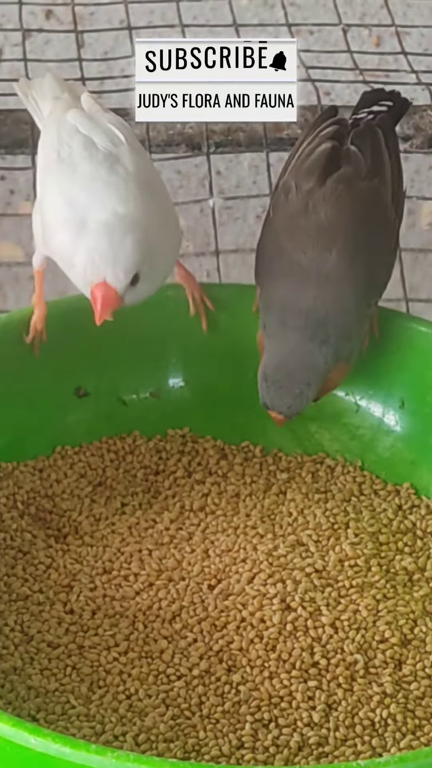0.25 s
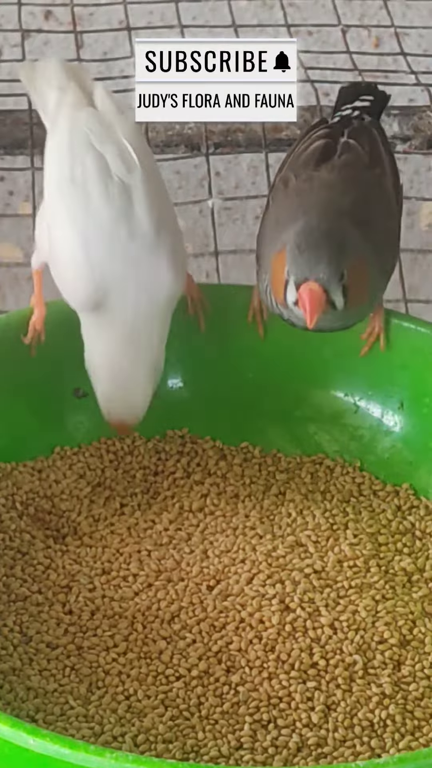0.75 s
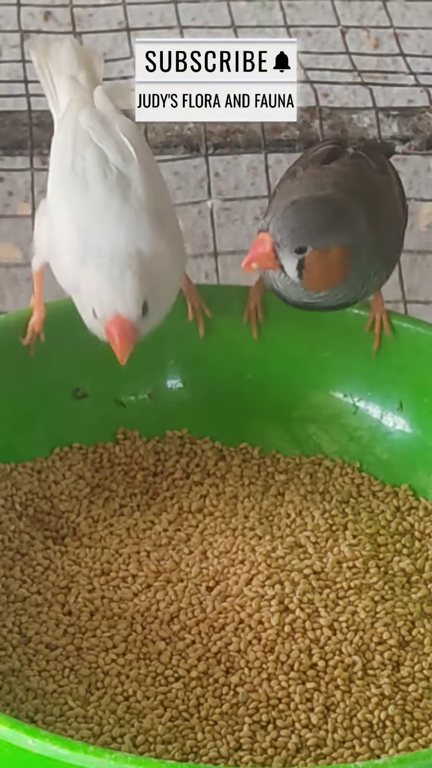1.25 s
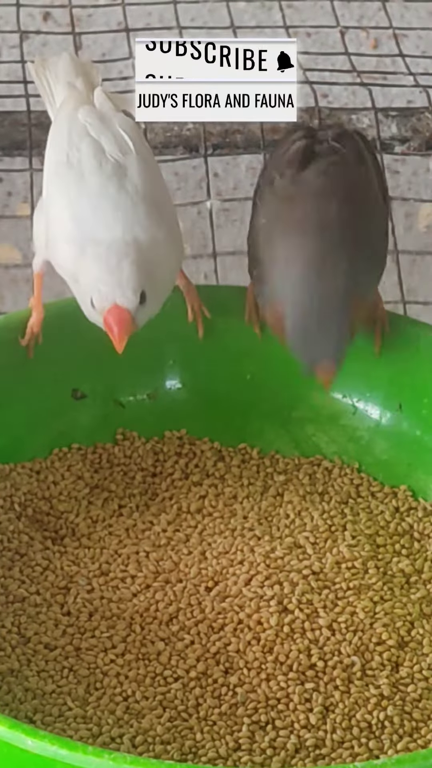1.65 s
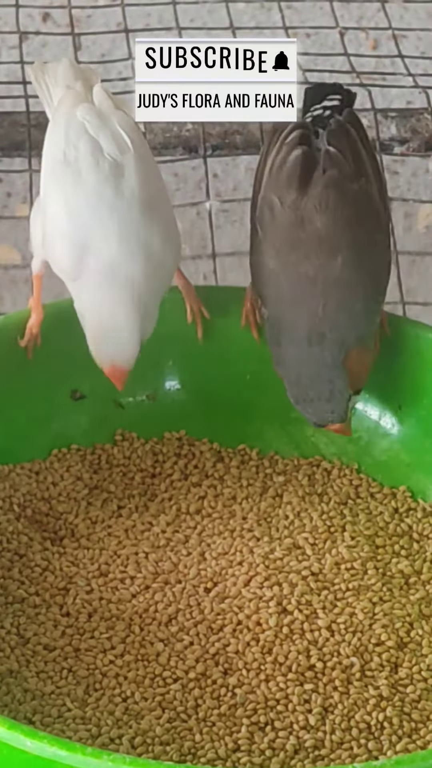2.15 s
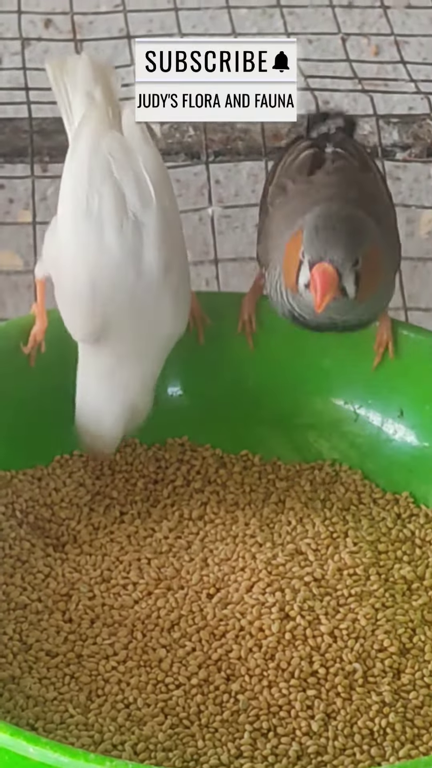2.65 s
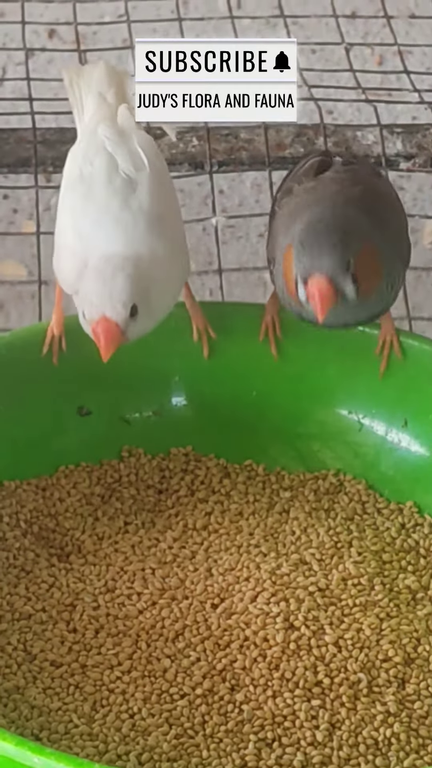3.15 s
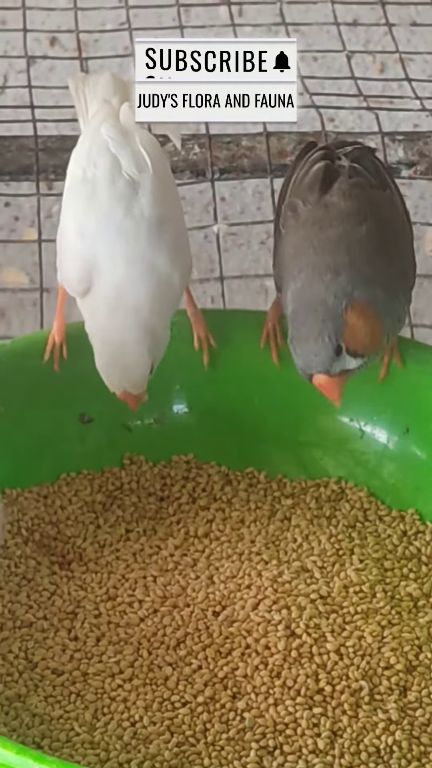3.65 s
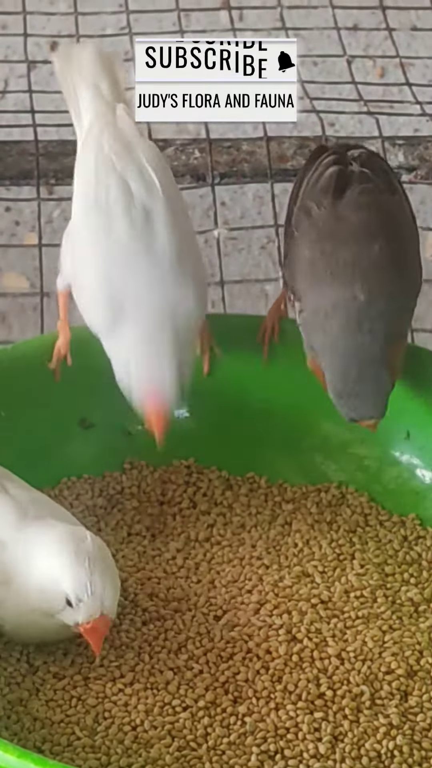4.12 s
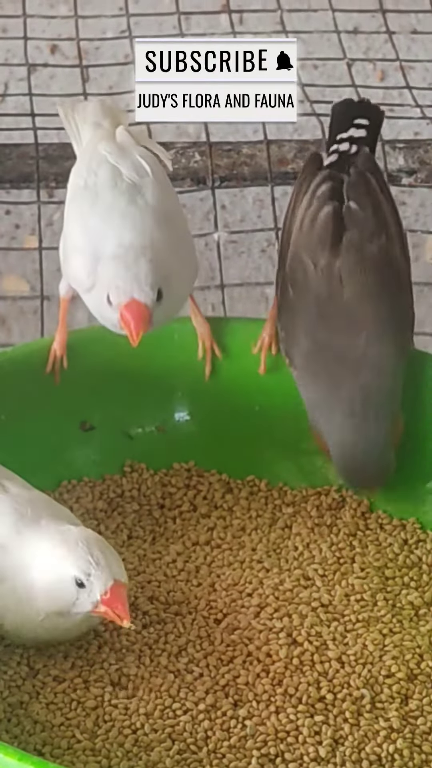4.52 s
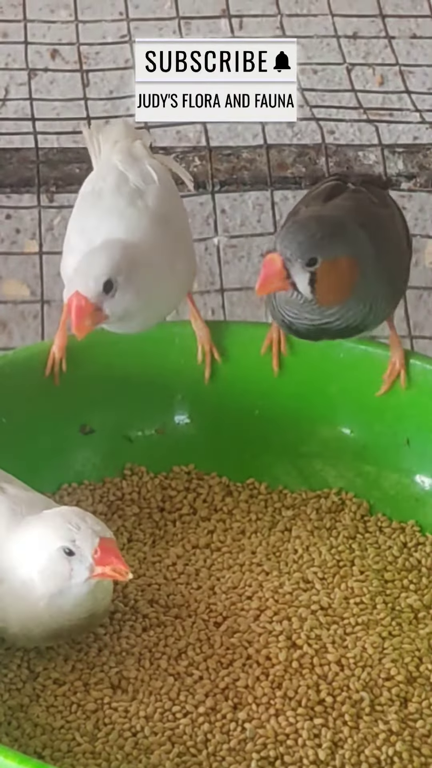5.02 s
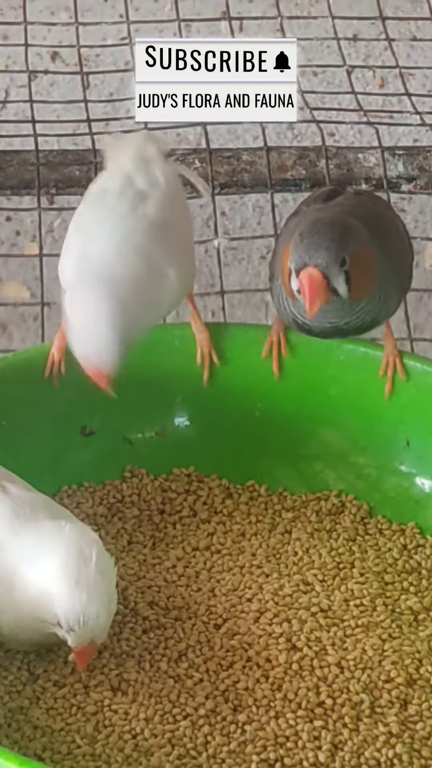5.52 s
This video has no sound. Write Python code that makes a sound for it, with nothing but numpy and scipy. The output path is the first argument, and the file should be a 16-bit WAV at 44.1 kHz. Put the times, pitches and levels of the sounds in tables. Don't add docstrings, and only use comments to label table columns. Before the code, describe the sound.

Finches feeding from a bowl in an echoing room give short nasal calls, raspy song and a repeated bright warble, with tiny husk ticks.

```python
import sys
import numpy as np
from scipy import signal
from scipy.fft import rfft, irfft, next_fast_len
from scipy.io import wavfile

SR = 44100
rng = np.random.default_rng(int(sys.argv[2]) if len(sys.argv) > 2 else 0)


def store_wav(level_fs):
    pcm = np.round(np.clip(np.atleast_2d(level_fs), -1, 1) * 32767)
    wavfile.write(sys.argv[1], SR, pcm.T.astype(np.int16))


def elevation(decibels):
    levels = np.asarray(decibels, float)
    return 10 ** (levels / 20)


N = 254898

# pitch_hz, left_minus_right_db
LEFT_RIGHT_TILT = [(60, 6), (150, 3.5), (380, 6.5), (950, 5.5), (2380, -1.5), (5980, -4.5), (15000, 5.5)]


def at_hz(points, hz):
    table_hz, values = np.array(points).T
    return np.interp(np.log(np.maximum(hz, 1)), np.log(table_hz), values)


def in_time(rows):
    return elevation(np.interp(np.arange(N) / SR, *np.transpose(rows)))


def rms_one(x):
    return x / np.sqrt(np.mean(x ** 2) + 1e-20)


def shaped(x, gain):
    n = x.shape[-1]
    return irfft(rfft(x) * gain(np.fft.rfftfreq(n, 1 / SR)), n)


def bump(hz, centre_hz, octaves):
    return np.exp(-(np.log2(hz / centre_hz + 1e-9) / octaves) ** 2)


def wander(n, rate_hz):
    noise = rng.standard_normal(n + 512)
    return rms_one(shaped(noise, lambda f: 1 / (1 + (f / rate_hz) ** 2))[:n])


def add(track, start_s, x):
    i = round(start_s * SR)
    track[i:i + len(x)] += x[:N - i]


def with_last(rows, value):
    return [(*row, value) for row in rows]


def ring(clicks, hz, t60_s):
    r = elevation(-60 / (t60_s * SR))
    w = 2 * np.pi * hz / SR
    return signal.lfilter([0, np.sin(w)], [1, -2 * r * np.cos(w), r * r], clicks + 1e-18)


def swell(n, rise, fall):
    u = np.arange(n) / n
    ramp = np.clip(np.minimum(u / rise, (1 - u) / fall), 0, 1)
    return np.sin(np.pi / 2 * ramp) ** 2


def voices(calls, arch, jitter, low_hz, clear_hz, closing_octaves=1):
    # pitch_hz, level_db
    nasal = [(400, -63), (700, -11), (1400, -9), (2500, -6), (5000, -7.5), (8000, -11), (12000, -11.5)]
    beak_db, beak_octaves, attack_s = 9, 0.2, 0.011

    def colour(f, top_hz):
        level_db = at_hz(nasal, f) + beak_db * bump(f, top_hz, beak_octaves)
        return elevation(level_db) * f ** 3 / (f ** 3 + low_hz ** 3)

    out = np.zeros(N)
    for start_s, length_s, hz, db, beak_hz, noisy in calls:
        n = round(length_s * SR)
        u = np.arange(n) / n
        pitch = hz * (1 - arch * (2 * u - 1.1) ** 2 + jitter * noisy * wander(n, 146))
        phase = 2 * np.pi * np.cumsum(pitch) / SR
        k = np.arange(1, 14000 // hz + 1)[:, None]
        moving_beak = beak_hz * 2 ** (closing_octaves * (1 - 2 * u))
        strength = colour(k * pitch, moving_beak) / (1 + (k * hz / clear_hz) ** 2)
        stack = np.sum(strength * np.sin(k * phase), axis=0)
        white = rng.standard_normal(n)
        breath = shaped(white, lambda f: colour(f, beak_hz) * f ** 2 / (f ** 2 + hz ** 2))
        noisy = np.clip(noisy, 0, 1)
        voice = np.sqrt(1 - noisy) * rms_one(stack) + np.sqrt(noisy) * rms_one(breath)
        loudness = elevation(db + 4 * noisy * wander(n, 80)) * swell(n, attack_s / length_s, .35)
        add(out, start_s, loudness * voice)
    return out


def whistles(notes, shake, throb_db, third_db):
    # pitch_hz, level_db
    throat = [(3000, -33), (4500, -9), (5700, -40.5), (7500, 1.8), (9000, -2.5), (12000, 6)]
    out = np.zeros(N)
    for start_s, length_s, first_hz, last_hz, db, over_db in notes:
        n = round(length_s * SR)
        plunge = first_hz > 1.2 * last_hz > 4000 and length_s > .032
        glide = 1 - (1 - np.arange(n) / n) ** (7 if plunge else 1)
        pitch = first_hz * (last_hz / first_hz) ** glide * (1 + shake * wander(n, 343))
        phase = 2 * np.pi * np.cumsum(pitch) / SR
        tone = np.sin(phase)
        tone += elevation(over_db + at_hz(throat, 2 * pitch)) * np.sin(2 * phase)
        tone += elevation(over_db + third_db + at_hz(throat, 3 * pitch)) * np.sin(3 * phase)
        loudness = elevation(db + throb_db * wander(n, 120)) * swell(n, .5 if plunge else .18, .08)
        add(out, start_s, loudness * tone)
    return out


def near_calls():
    # start_s, length_s, pitch_hz, level_db, beak_hz
    calls = [
        (.556, 0.058, 681.7, -39.5, 5350),
        (1.085, 0.047, 696.4, -38.5, 5500),
        (1.985, .0785, 666.4, -42, 4570),
        (3.81, 0.049, 682.5, -38.5, 4500),
    ]
    breath_share, dip_hz, dip_db, dip_octaves = .25, 2200, -7.5, 0.36
    sound = voices(with_last(calls, breath_share), arch=0.12, jitter=0.019, low_hz=300, clear_hz=7000)
    return shaped(sound, lambda f: elevation(dip_db * bump(f, dip_hz, dip_octaves)))


def warbler():
    # start_s (after the phrase begins), length_s, first_hz, last_hz, level_db
    phrase = [
        (0, .045, 5146, 3703, -27),
        (0.027, 0.0098, 4275, 4840, -29),
        (0.034, 0.02, 2010, 2470, -38.5),
        (0.048, .027, 4670, 4150, -31),
        (0.069, .038, 2852, 3563, -21.5),
        (0.102, .036, 3450, 2216, -23),
        (0.137, .03, 2250, 3335, -22),
        (0.164, .015, 3178, 4760, -22.5),
    ]
    # start_s, level_db, stretch (times as long), rasp_db
    repeats = [
        (2.294, -2, 1.002, -0.5),
        (3.725, -0.55, 1.032, 2.6),
        (5.174, -1, .99, 1.6),
    ]
    # start_s (after it begins), length_s, pitch_hz, level_db, beak_hz
    phrase_rasps = [
        (0.025, .071, 2027, -32.5, 4440),
        (0.043, .13, 2750, -42, 7300),
        (.148, .03, 2100, -27, 3400),
        (0.165, 0.036, 2153, -32.5, 9700),
    ]
    overtones_db, brighter_db_per_octave, rasp_breath_share = -11.5, 14, 0.97
    notes, rasps = [], []
    for start_s, more_db, stretch, rasp_db in repeats:
        for t, length_s, first_hz, last_hz, db in phrase:
            over_db = overtones_db + brighter_db_per_octave * abs(np.log2(first_hz / 3000))
            notes.append((start_s + stretch * t, stretch * length_s, first_hz, last_hz,
                          db + more_db, over_db))
        for t, length_s, hz, db, beak_hz in phrase_rasps:
            rasps.append((start_s + stretch * t, length_s, hz, db + rasp_db, beak_hz, rasp_breath_share))
    tones = whistles(notes, shake=.012, throb_db=4, third_db=-5)
    return tones + voices(rasps, arch=0.0375, jitter=0.0305, low_hz=2100, clear_hz=11500)


def singer():
    # start_s (after the motif begins), length_s, pitch_hz, level_db, beak_hz
    motif = [
        (0, 0.03, 861, -52, 7000),
        (0.07, .036, 947, -38, 7000),
        (0.147, 0.027, 900, -41.5, 4440),
        (.217, .095, 950, -38, 3713),
        (0.393, .07, 897, -50.5, 6800),
    ]
    # start_s, level_db
    repeats = [
        (1.838, -2),
        (2.413, -4),
        (3.222, -2.5),
        (4.54, -2),
    ]
    # start_s, length_s, level_db
    lead_ins = [
        (1.35, 0.095, -49),
        (1.483, 0.025, -48),
        (1.644, 0.035, -48),
        (3.018, 0.032, -54),
        (4.129, 0.029, -53),
        (4.301, 0.076, -54),
        (4.341, .021, -44.5),
    ]
    # start_s, length_s, pitch_hz, level_db, beak_hz
    squawk = [
        (5.524, 0.068, 3015, -26, 6300),
        (5.53, .055, 892, -30.5, 3530),
    ]
    # length_s, first_hz, last_hz, level_db, overtones_db
    slide = (.025, 2750, 2400, -45, 18)
    # length_s, first_hz, last_hz, level_db, overtones_db
    rasp_harmonic = (.022, 2950, 2880, -36, -20)
    slide_s, rasp_harmonic_s = .041, .232
    song_breath_share, squawk_breath_share = 0.733, 1
    lead_in_hz, lead_in_beak_hz = 900, 7670
    syllables, notes = [], []
    for start_s, more_db in repeats:
        for t, length_s, hz, db, beak_hz in motif:
            syllables.append((start_s + t, length_s, hz, db + more_db, beak_hz))
        for t, (length_s, first_hz, last_hz, db, over_db) in ((slide_s, slide), (rasp_harmonic_s, rasp_harmonic)):
            notes.append((start_s + t, length_s, first_hz, last_hz, db + more_db, over_db))
    for start_s, length_s, db in lead_ins:
        syllables.append((start_s, length_s, lead_in_hz, db, lead_in_beak_hz))
    calls = with_last(syllables, song_breath_share) + with_last(squawk, squawk_breath_share)
    return voices(calls, arch=0.0379, jitter=0.046, low_hz=1930, clear_hz=4300), notes


def far_birds(song_notes):
    # start_s, length_s, pitch_hz, level_db, beak_hz
    calls = [
        (1.51, .078, 503.7, -47, 3050),
        (1.715, 0.076, 464, -47, 2470),
        (3.095, .12, 466.3, -47, 2400),
        (4.214, .0836, 499.6, -45.5, 3520),
        (4.411, 0.071, 461, -48.5, 3550),
        (5.687, .09, 540.3, -39.5, 3650),
    ]
    # start_s, length_s, pitch_hz, level_db, beak_hz
    grunts = [
        (.44, 0.025, 300, -73, 990),
        (2.84, 0.055, 300, -53.5, 1200),
    ]
    # start_s, length_s, first_hz, last_hz, level_db
    chirps = [
        (1.375, .026, 3490, 3200, -54),
        (1.395, 0.029, 1997, 2590, -44),
        (1.409, 0.025, 5660, 4430, -45.5),
        (1.425, 0.0044, 4460, 4200, -40),
        (1.435, .052, 2825, 3080, -50),
        (1.47, 0.024, 3000, 2570, -60),
        (1.495, 0.0362, 2495, 1980, -47),
        (1.685, 0.038, 1533, 2027, -49),
        (1.9, 0.054, 2460, 2956, -46.5),
    ]
    # start_s, length_s, first_hz, last_hz, level_db
    peeps = [
        (.03, 0.034, 5420, 6690, -65),
        (.86, .11, 3500, 3500, -73.5),
        (5.547, .025, 6300, 6990, -24.5),
    ]
    sound = voices(with_last(calls, .05), arch=.06, jitter=.015, low_hz=1800, clear_hz=4500,
                   closing_octaves=.1)
    sound += voices(with_last(grunts, 0.37), arch=0.063, jitter=0.017, low_hz=694, clear_hz=1490)
    notes = with_last(chirps, -8) + with_last(peeps, -28) + song_notes
    return sound + whistles(notes, shake=.022, throb_db=5.0, third_db=-27.5)


def husks():
    # start_s, peak_db, ring_hz, snap_db
    ticks = [
        (0.243, -58, 8000, -3),
        (0.6675, -49, 8000, -3),
        (0.871, -52, 8000, -6),
        (1.0132, -48, 8000, -16),
        (1.1865, -39, 8000, 1),
        (2.782, -42, 8000, 8),
        (3.076, -43.5, 8000, 4),
        (3.2905, -50, 8000, 7),
    ]
    out = np.zeros(N)
    for start_s, db, hz, snap_db in ticks:
        crack = rng.standard_normal(600) * np.exp(-np.arange(600) / 60.0)
        snap = elevation(snap_db) * np.diff(crack, prepend=0)
        add(out, start_s, elevation(db - 4.5) * (ring(crack, hz, 0.0029) + snap))
    return out


def perch():
    # pitch_hz, level_db, t60_s
    modes = [(174, -13.5, 0.42), (437.7, -15.5, 0.033), (800, -6, 0.016), (1326, -3.5, 0.028),
             (2400, -1.5, 0.017), (4200, 2.5, 0.0012), (6300, 0, 0.0044), (8000, 8, 0.0029),
             (10630, -2, 0.00435), (13730, -9, 0.0057)]
    start_s, level_db, shower_t60_s = 4.869, -42.5, 0.21
    t = np.arange(SR // 3) / SR
    rebound = 0.19 * np.exp(-((t - .128) / 0.036) ** 2)
    shower = elevation(-60 * t / shower_t60_s) + rebound
    shower *= np.clip((.2 - t) / 0.043, .03, 1)
    sizes = elevation(2.5 * rng.exponential(1, t.size)) * shower
    clatter = 0
    for hz, db, t60_s in modes:
        hits = rng.random(t.size) < 3000 / SR
        clicks = sizes * hits * rng.standard_normal(t.size)
        clatter = clatter + elevation(db) * rms_one(ring(clicks, hz, t60_s))
    track = np.zeros(N)
    add(track, start_s, elevation(level_db) * rms_one(clatter))
    return track


def heard(x, wet_db, lag_s, pan_db, treble_db):
    # pitch_hz, t60_s
    room_t60 = [(500, 0.43), (3000, 0.38), (8000, 0.47), (14000, 0.078)]
    # pitch_hz, level_db
    ports_colour = [(60, -24), (200, 5), (1600, 2), (2500, 0.87), (9100, 4.5), (9900, -10.5), (15000, -16)]
    early_db, early_t60_s = 15, 0.027
    t = np.arange(SR // 2) / SR
    white = rng.standard_normal((2, t.size))
    tail = 0
    for low in 100 * 2. ** np.arange(0, 8):
        band = shaped(white, lambda f: (f >= low) & (f < 2 * low))
        late = elevation(-60 * t / at_hz(room_t60, 1.53 * low))
        tail = tail + band * (late + elevation(early_db - 60 * t / early_t60_s))
    tail = tail * np.clip(t / 0.0063 - .3, 0, 1)
    echo = elevation(wet_db) * tail / np.sqrt(np.sum(tail ** 2) / 2)
    size = next_fast_len(N + t.size)
    f = np.fft.rfftfreq(size, 1 / SR)
    side = np.array([[1], [-1]])
    delay_s = 0.000935 + side * lag_s / 2
    direct = elevation(side * pan_db / 2) * np.exp(-2j * np.pi * f * delay_s)
    treble = treble_db * np.clip(f / 1000 - 9.3, 0, 1)
    ports = elevation(at_hz(ports_colour, f) + treble + side * at_hz(LEFT_RIGHT_TILT, f) / 2)
    return irfft(rfft(x, size) * (direct + rfft(echo, size)) * ports, size)[:, :N]


def bed(colour):
    # pitch_hz, left_right_likeness (0-1)
    likeness = [(60, 0.4), (240, 0.79), (950, 0.046), (3770, 0.047), (15000, 0.076)]
    mid, side = rng.standard_normal((2, N))
    alike = lambda f: np.clip(at_hz(likeness, f), -1, 1)
    common = shaped(mid, lambda f: np.sqrt(1 + alike(f)))
    apart = shaped(side, lambda f: np.sqrt(1 - alike(f)))
    both = np.array([common + apart, common - apart])
    half = np.array([[.5], [-.5]])
    return rms_one(shaped(both, lambda f: elevation(at_hz(colour, f) + half * at_hz(LEFT_RIGHT_TILT, f))))


def far_chatter():
    # time_s, level_db
    liveliness = [(.5, -78), (1.41, -66.5), (1.53, -54), (2.38, -47), (2.53, -48), (2.86, -48.5),
                  (2.96, -68.5), (3.09, -54), (3.31, -49), (3.78, -52), (3.91, -53), (4.04, -55),
                  (4.41, -49.5), (4.8, -51), (5.05, -73), (5.22, -50), (5.38, -47), (5.78, -46)]
    # pitch_hz, level_db (per Hz)
    chatter_colour = [(500, -11.5), (1000, -3.5), (1900, -6), (3130, 1.5), (4500, -23), (7300, -3.5),
                      (9200, -9), (10000, -43), (15500, -49.5)]
    fade_in = np.clip(5 * (np.arange(N) / SR - .55), 0, 1)
    return in_time(liveliness) * elevation(1.5 * wander(N, 20)) * fade_in * bed(chatter_colour)


def cricket():
    # time_s, level_db
    loudness = [(0, -74), (.05, -71), (.25, -74), (.55, -78), (1.0, -84), (5.78, -84)]
    chirr = rms_one(ring(rng.standard_normal((2, N)), 2680, 0.021))
    return in_time(loudness) * elevation(1.2 * wander(N, 60)) * chirr


def room_air():
    # pitch_hz, level_db (per Hz)
    air_colour = [(12, -35), (22, -4), (53, -15), (87, -9.5), (140, -20), (196, -12.5), (282, -18),
                  (500, -20), (1630, -32), (4500, -41.5), (7500, -32.5), (9300, -39), (10500, -50),
                  (15500, -60)]
    return elevation(-59.5 + 3.5) * bed(air_colour)


def scene():
    song, song_notes = singer()
    near = near_calls() + husks() + perch()
    birds = heard(near, wet_db=0.5, lag_s=0.000426, pan_db=0.0, treble_db=9.0)
    birds += heard(warbler(), wet_db=0.5, lag_s=0.000467, pan_db=-2.0, treble_db=-12.0)
    birds += heard(song, wet_db=2.0, lag_s=0.000384, pan_db=-4.5, treble_db=-1.5)
    birds += heard(far_birds(song_notes), wet_db=0.5, lag_s=0.000432, pan_db=-2.5, treble_db=11.0)
    return birds + far_chatter() + cricket() + room_air()


def thinned(x):
    # pitch_hz, share (0-1)
    emptied = [(900, 0), (1500, .1), (3500, .08), (7000, .03), (8900, .05), (9500, .6), (10000, .72),
               (14600, .74), (15400, 1)]
    f, _, z = signal.stft(x, SR, nperseg=2048, noverlap=1024)
    power = np.mean(np.abs(z) ** 2, axis=0) + 1e-20
    loudest = power[40:].max(0)
    edges = np.geomspace(900, 15400, 100)
    for low, high in zip(edges, np.append(edges[1:], SR)):
        band = (f >= low) & (f < high)
        depth_db = 10 * np.log10(power[band].mean(0) / loudest)
        depth_db = depth_db + 16 * rng.standard_normal(z.shape[-1])
        share = min(at_hz(emptied, low), 1)
        z[:, band] *= depth_db > np.quantile(depth_db, share)
    return signal.istft(z, SR, nperseg=2048, noverlap=1024)[1][:, :N]


def low_pass(x):
    return signal.sosfilt(signal.butter(12, 15660, fs=SR, output="sos"), x)


def record(dry):
    mix = thinned(dry)
    return low_pass(mix)


dry = scene()
out = record(dry)
store_wav(out)
```